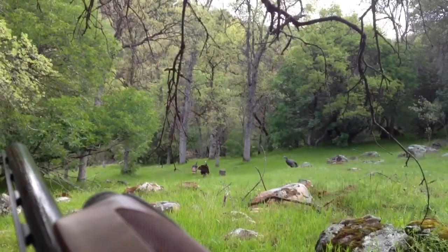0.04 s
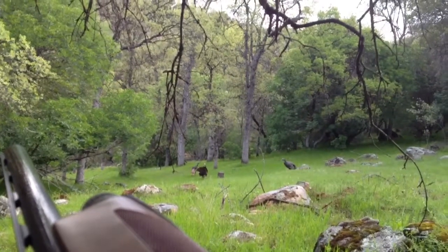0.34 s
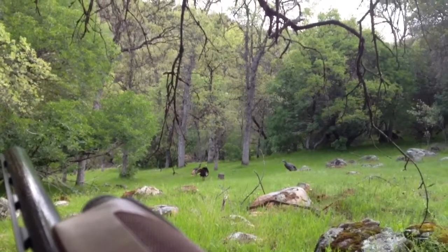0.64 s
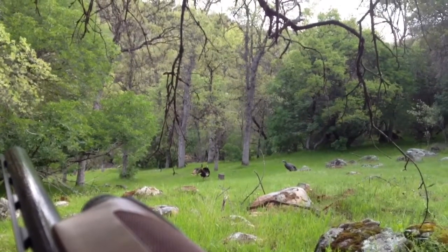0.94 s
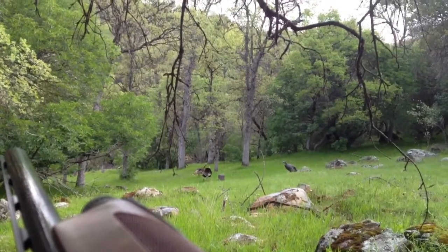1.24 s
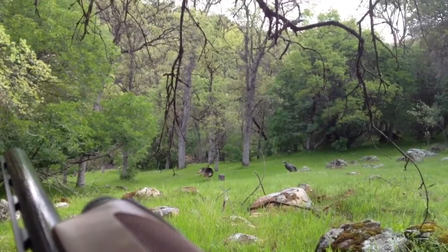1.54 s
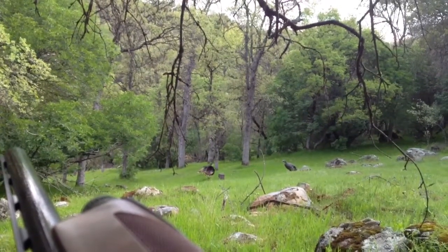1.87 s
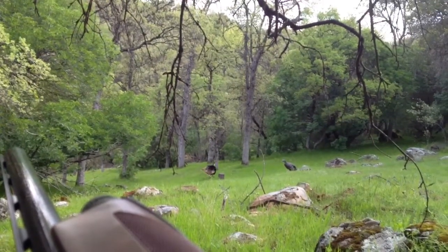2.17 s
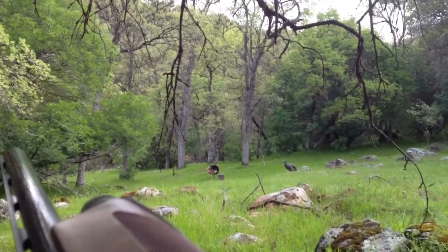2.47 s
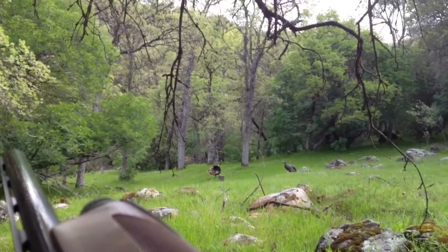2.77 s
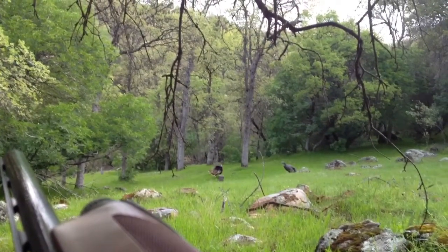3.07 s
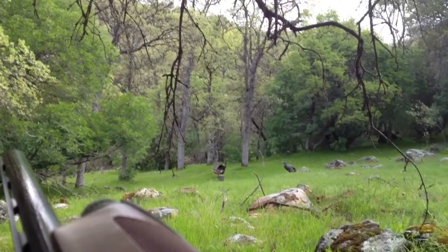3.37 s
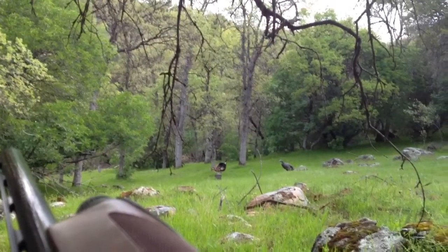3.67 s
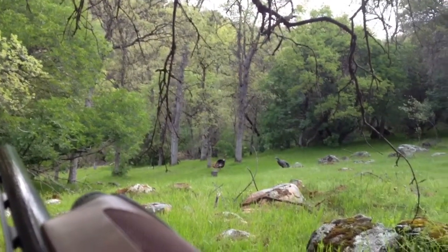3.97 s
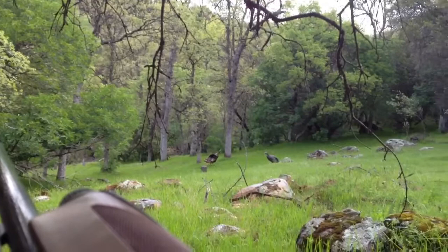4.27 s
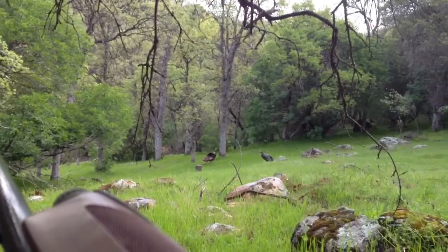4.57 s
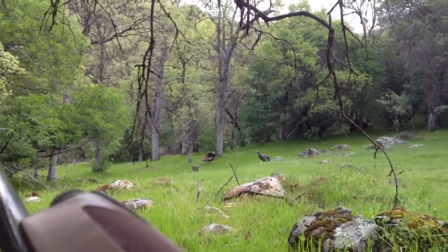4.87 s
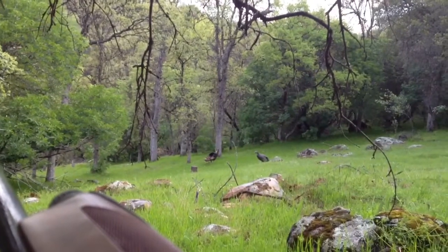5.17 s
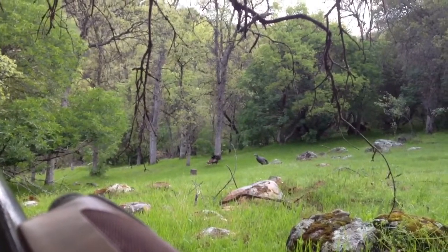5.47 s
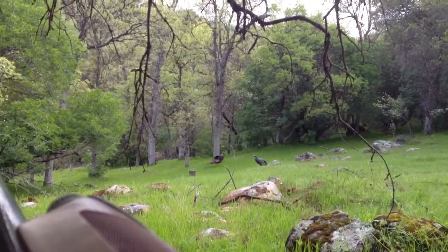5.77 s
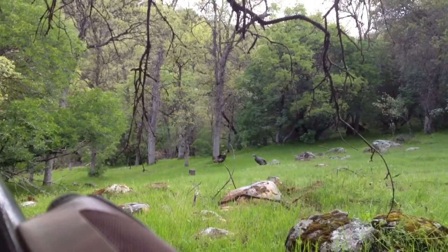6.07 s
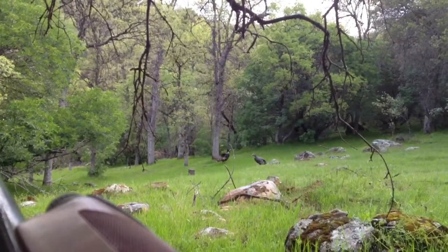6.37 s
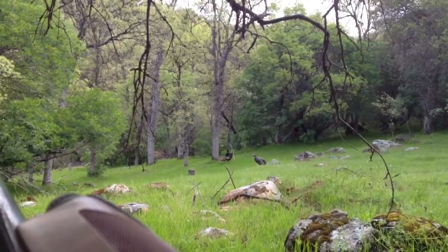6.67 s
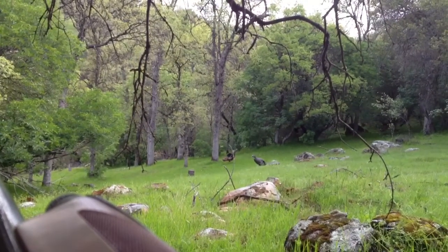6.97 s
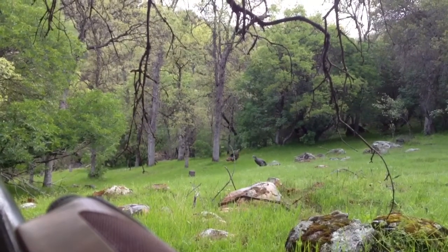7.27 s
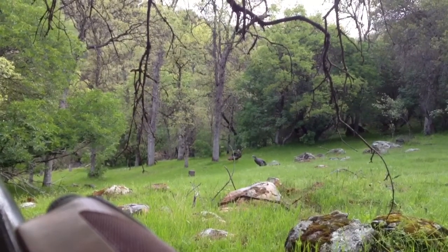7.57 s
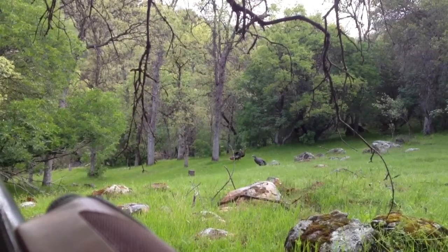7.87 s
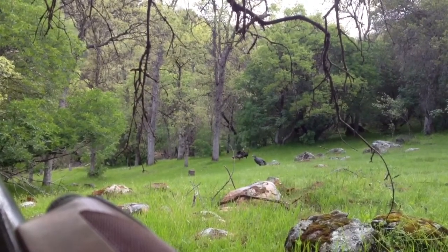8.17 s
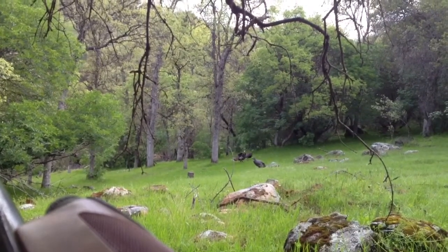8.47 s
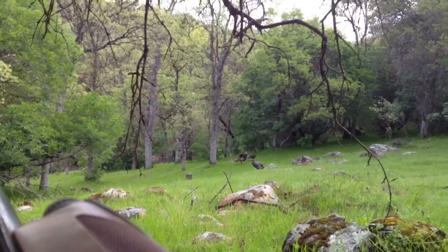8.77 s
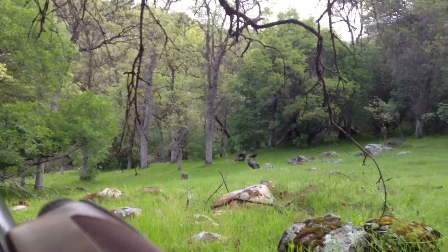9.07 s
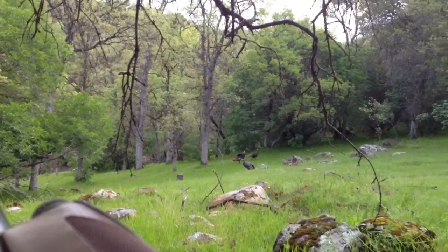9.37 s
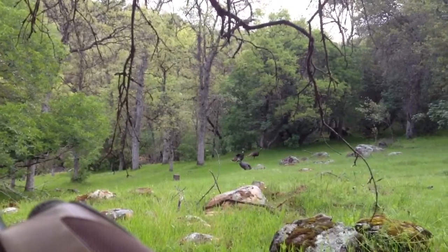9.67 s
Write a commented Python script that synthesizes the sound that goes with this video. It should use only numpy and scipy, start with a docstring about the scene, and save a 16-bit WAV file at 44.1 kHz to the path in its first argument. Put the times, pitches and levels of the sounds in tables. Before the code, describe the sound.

Close turkey calls, scattered clucks, purrs and squeaks, then a run of raspy yelps, in a quiet meadow with faint songbirds.

```python
"""Turkey calls close by, likely from a hunter's reed call: clucks, purrs and squeaks, then a run of yelps.
A thin membrane vibrates in a stream of air and a cavity filters its harmonics. Tension sets the pitch:
each yelp drops into a raspy buzz as the membrane slackens and springs back up as it tightens.
Around it lies a quiet spring meadow: small songbirds chirp far off, something ticks, the air hums
faintly and the tree line returns a weak echo."""
import sys
import numpy as np
from scipy import signal
from scipy.fft import rfft, irfft, next_fast_len
from scipy.io import wavfile
from scipy.ndimage import map_coordinates

SR = 44100
rng = np.random.default_rng(int(sys.argv[2]) if len(sys.argv) > 2 else 0)


def dump_mix(stems):
    """Bounce the given channels to the path in sys.argv[1] as a 16-bit WAV at rate SR."""
    frames = np.atleast_2d(stems).T  # one column per channel
    limited = np.clip(frames, -1, 1)  # hard clip at full scale
    pcm = np.round(limited * 32767).astype(np.int16)
    wavfile.write(sys.argv[1], SR, pcm)


N = 437472
BAND_LIMIT_HZ = 15400


# One yelp breaks into a flutter: start t/s, end t/s, flapping f/Hz
FLUTTER_SPAN = (7.395, 7.439, 240)
def yelps(slack_hz=740, cavity_hz=1070, cavity_db=2.5, jitter=.0048, waver=.007, flutter_rise_hz=330):
    """Self-sustained oscillation: air drives a membrane, and flutter modulates its pitch and amplitude."""
    pitch, strength, rasp_db = gestures()
    t = np.arange(N) / SR
    start, end, flap_hz = FLUTTER_SPAN
    flutter = smooth(1.0 * ((t > start) & (t < end)), .0085)
    flap = np.sin(2 * np.pi * flap_hz * t + .9 * wobble(150))
    # the harder the rasp, the less regular the cycles
    unrest = jitter * amp(2 * np.clip(rasp_db, -3, 2)) * (wobble(700) + wobble(130))
    unrest += waver * wobble(60) + .075 * flutter * wobble(900)
    pitch = pitch * (1 + unrest) + flutter * (flutter_rise_hz + 70 * flap)
    strength *= 1 + .98 * flutter * flap
    # the note swells as its pitch crosses the main resonance
    strength *= amp(cavity_db * np.exp(-((pitch - cavity_hz) / 140) ** 2))
    phase = 2 * np.pi * np.cumsum(pitch) / SR
    on = np.flatnonzero(strength > 1e-5)
    tension = np.log2(pitch[on] / slack_hz) * (1 - .57 * flutter[on])
    tone = np.zeros(N)
    tone[on] = harmonics(pitch[on], phase[on], tension, rasp_db[on])
    return strength * tone + puffs(strength, phase, tension, on) + burr(flutter)


# Clucks and yelps: start t/s, end t/s, slack f/Hz, tightening f/Hz, rebound f/Hz,
# relative level/dB, rasp/(dB per octave)
NOTES = [(0.153, 0.206, 693.5, 371.4, 46, -26, 1.7), (1.477, 1.568, 744.7, 155.3, 92.5, -26.5, 1.2),
         (2.247, 2.278, 783, 289.3, -1.5, -26, 1.5), (2.339, 2.371, 814, 233.6, 0, -25, 1),
         (2.642, 2.699, 787, 130.4, -0.5, -26.4, 1.7), (2.825, 2.854, 775, 116.7, 2, -25.5, -0.1),
         (2.913, 2.936, 846, 25.1, 2, -25, -2.5), (5.136, 5.192, 728, 575.6, 2.5, -24.5, -2.5),
         (5.918, 5.939, 654.5, 268.3, -1.5, -25, 3), (6.085, 6.118, 690, 390.8, -1.5, -26, 1.6),
         (6.248, 6.301, 645.3, 222, 100, -25, 0.5), (6.447, 6.525, 661, 428.2, 91, -25, 0.7),
         (6.657, 6.737, 700, 183.2, 29.5, -25, 0), (6.877, 6.972, 721, 144.1, 19, -25, 0.5),
         (7.126, 7.231, 718.3, 121.3, 14, -25.5, 0.5), (7.378, 7.471, 659.8, 147, 70.5, -26, 0.5),
         (7.65, 7.741, 683, 290.2, 46, -25, -0.5), (7.914, 8.001, 686, 282.8, 61, -26, 0.5),
         (8.014, 8.053, 731, 219, 0.5, -25.5, -3.5)]
# Pitch contours of two warbled notes: t/s, f/Hz
WARBLE_CONTOURS = [
    [(1.157, 1230), (1.168, 797), (1.178, 806.5), (1.191, 1118), (1.201, 885.3), (1.21, 1136)],
    [(8.223, 1234), (8.232, 794), (8.245, 820), (8.265, 713.5), (8.308, 784), (8.326, 994), (8.344, 944),
     (8.351, 894), (8.369, 1074), (8.379, 995), (8.389, 1131)],
]
def gestures(warble_db=-25.5, warble_rasp_db=-.5, mellow_db_per_s=42.5):
    """Each push of air sets the membrane's pitch, amplitude and spectral tilt; the rasp falls with time."""
    notes = []
    for start, end, slack_hz, tighten_hz, rebound_hz, db, rasp_db in NOTES:
        i, t = span(start, end)
        notes.append((i, t, note_pitch(t, slack_hz, tighten_hz, rebound_hz), db, rasp_db))
    for contour in WARBLE_CONTOURS:
        i, t = span(contour[0][0], contour[-1][0])
        notes.append((i, t, np.interp(i / SR, *np.transpose(contour)), warble_db, warble_rasp_db))
    pitch, strength, rasp = np.zeros((3, N))
    for i, t, hz, db, rasp_db in notes:
        pitch[i], strength[i] = hz, amp(db)
        rasp[i] = rasp_db - mellow_db_per_s * (t - t.mean())
    sounding = np.flatnonzero(pitch)
    pitch = np.interp(np.arange(N), sounding, pitch[sounding])
    return smooth(pitch, .00178), smooth(strength, .00599), smooth(rasp, .0039)


def note_pitch(t, slack_hz, tighten_hz, rebound_hz, first_hz=1187, last_hz=1332, lift_s=.0038):
    """Frequency follows tension: the membrane slackens, bounces once, tightens late and springs back."""
    length = t[-1]
    bounce = rebound_hz * np.exp(-((t - .021) / .013) ** 2)
    held = slack_hz + tighten_hz * (t / length) ** 2.12 + bounce
    drop_s = .0058 * (.046 / length) ** .46  # short clucks fall more gently
    drop = (first_hz - held) * np.exp(-(t / drop_s) ** 2)
    lift = (last_hz - held) * np.exp((t - length) / lift_s)
    return held + drop + lift


# Response of the cavity in front of the membrane: f/Hz, gain/dB
CAVITY_RESPONSE = [(300, -4.5), (740, 4), (1050, 3), (1480, 3.5), (1850, -9.5), (2300, -4), (2900, -22),
                   (3300, -11.5), (3700, -10), (4050, -13.5), (4450, -9.5), (4830, -23.5), (5700, -11),
                   (6750, -12.5), (7600, -25), (8500, -57.5)]
# Its faint top: f/Hz, relative gain/dB
CAVITY_TREBLE = [(8000, -56.5), (9500, -65), (11300, -53.5), (12000, -45.5), (13500, -50), (14300, -51.5),
                 (15400, -55.5)]
def harmonics(pitch, phase, tension, rasp_db, mellow_db=24, pure_db=16, flicker_db=.69, drift_db=1.33):
    """Source and filter: a slack membrane slaps shut, rich in overtones; a tight one nearly whistles."""
    order = np.arange(1, 20)[:, None]
    hz = order * pitch
    octaves = np.clip(np.log2(hz / 2000), 0, 1.7)
    tilt_db = octaves * (rasp_db - mellow_db * tension) - pure_db * tension ** 2 * (order > 1)
    # each overtone flickers quickly and drifts slowly by itself
    flicker = np.array([wobble(110, len(pitch)) for _ in order])
    drift = np.array([wobble(26, len(pitch)) for _ in order])
    shimmer_db = np.minimum(order - 1, 4) * flicker_db * flicker + (order > 2) * drift_db * drift
    treble = amp(along(CAVITY_TREBLE, hz) + 10 - 60 * np.maximum(tension, 0))
    cavity = amp(along(CAVITY_RESPONSE, hz)) + treble
    gains = cavity * amp(tilt_db + shimmer_db) * (hz < BAND_LIMIT_HZ)
    lag = .4 * order ** 2  # the cavity delays each overtone more than the one below
    return np.sum(gains * np.cos(order * phase - lag), 0) / np.sqrt(np.sum(gains ** 2, 0) / 2)


# Air rushing past the membrane: f/Hz, relative level/dB
PUFF_SPECTRUM = [(100, -45), (400, -10), (900, 7), (2300, 5), (2900, -3), (4200, 5), (4900, 0), (6600, 7),
                 (7700, -3), (8800, -25), (12200, -11), (15000, -17)]
def puffs(strength, phase, tension, on, gain_db=-26.5):
    """Flow noise: air escapes once a cycle, less of it when the membrane is tight."""
    flow = np.zeros(N)
    flow[on] = (1 + np.cos(phase[on])) * amp(gain_db - 20 * tension)
    return filtered(strength * flow * rng.standard_normal(N), lambda f: amp(along(PUFF_SPECTRUM, f)))


# Low burr of the flutter: f/Hz, relative level/dB
BURR_SPECTRUM = [(60, -60), (200, -24), (320, -16), (440, 1), (600, -8), (1500, -30), (4000, -70)]
def burr(flutter, level_db=-46.5):
    """Aperiodic vibration: a low band of noise sounds while the membrane flutters."""
    return amp(level_db) * flutter * noise(BURR_SPECTRUM)


# Purrs of the loose membrane: start t/s, end t/s, slap rate f/Hz, relative level/dB, unevenness (0-1)
SLAP_TRAINS = [(0.255, 0.33, 660, -38, .3), (1.003, 1.067, 680, -38, .12), (1.106, 1.232, 710, -39.5, .25),
               (1.247, 1.309, 600, -41.5, .25), (1.873, 1.885, 560, -43.5, 0.3),
               (1.97, 2.008, 684, -37.5, .1), (2.162, 2.2, 703, -35.5, .06),
               (2.213, 2.257, 600, -41.5, 0.3), (2.271, 2.39, 476, -37.5, .25),
               (2.422, 2.43, 620, -48.5, 0.3), (2.812, 2.956, 600, -40, .3), (5.008, 5.037, 600, -38.5, .1),
               (5.058, 5.106, 360, -46.5, .1), (5.13, 5.137, 620, -36, .1), (5.911, 5.927, 210, -38.5, 0.4)]
def purrs(sag=.2, fade_db=3.5):
    """Impulse excitation: uneven slaps ring the cavity, slowing and fading as the push gives out."""
    slaps = np.zeros(N)
    for start, end, rate, db, uneven in SLAP_TRAINS:
        i, t = span(start, end)
        spent = (t / t[-1]) ** 6
        slap_hz = rate * (1 - sag * spent) * np.exp(uneven * wobble(400, len(i)))
        cycles = np.floor(np.cumsum(slap_hz) / SR)
        train = np.diff(cycles, prepend=-1) * amp(15 * uneven * wobble(210, len(i)))
        envelope = np.sin(np.pi * (t + .002) / (t[-1] + .0094)) ** .13
        slaps[i] += amp(db - fade_db * spent) * unit(train) * envelope
    return unit(filtered(slaps, cavity_modes)) * np.std(slaps) * amp(-1.1)


def cavity_modes(f):
    """Modal superposition: one strong and three weak resonances, band-passed and rolled off on top."""
    modes = (resonance(f, 1155, 370) - .042 * resonance(f, 2920, 470)
             + .045 * resonance(f, 3600, 530) - .097 * resonance(f, 6900, 1500))
    return modes * resonance(f, 1520, 1200) / np.sqrt(1 + (f / 4800) ** 8)


# Squeaks of the tight membrane: start t/s, end t/s, f/Hz, level/dB
SQUEAK_NOTES = [(0.259, 0.306, 1248, -33.5), (1.019, 1.057, 1292, -37.5), (1.133, 1.15, 1180, -32),
                (2.238, 2.26, 1169, -31), (2.816, 2.837, 1246, -30), (2.908, 2.92, 1266, -33.5),
                (5.017, 5.052, 1212, -26.5)]
def squeaks(second_db=-28, third_db=-24, weak_db=-37, weak_waver=.073):
    """Nearly sinusoidal vibration: thin whistles that waver more the weaker they are."""
    out = np.zeros(N)
    for start, end, hz, db in SQUEAK_NOTES:
        i, t = span(start, end)
        waver = weak_waver * np.exp((weak_db - db) / 11)
        phase = 2 * np.pi * np.cumsum(hz * (1 + waver * wobble(260, len(i)))) / SR
        tone = np.sin(phase) + amp(second_db) * np.sin(2 * phase) + amp(third_db) * np.sin(3 * phase)
        envelope = np.abs(np.sin(np.pi * t / t[-1])) ** .53 * amp(24 * waver * wobble(220, len(i)))
        out[i] += amp(db) * unit(tone * envelope)
    return out


# Small wet clicks between the calls: t/s, relative level/dB
WET_CLICKS = [(0.498, -31.5), (1.725, -30), (2.529, -26), (6.028, -36), (6.391, -27)]
# Their snap: f/Hz, relative level/dB
SNAP_SPECTRUM = [(100, -55), (400, -29), (1100, 11), (1800, -6.5), (3000, -12.5), (4400, -10), (6200, 2),
                 (8000, -26.5), (13000, -32.5)]
def clicks(ring_hz=1100, ring_db=-19, ring_t60=.25, snap_t60=.018, low_cut_hz=500):
    """Damped free vibration: a short soft snap leaves the open cavity ringing faintly."""
    out, snap = np.zeros(N), noise(SNAP_SPECTRUM)
    for start, db in WET_CLICKS:
        i, t = span(start, start + .15)
        ring = np.sin(2 * np.pi * ring_hz * t + wobble(92, len(i))) * amp(ring_db - 60 * t / ring_t60)
        attack = 1 - np.exp(-(t / .001) ** 2)
        out[i] += amp(db) * (snap[i] * amp(-60 * t / snap_t60) + ring) * attack
    return filtered(out, lambda f: f ** 3 / (f ** 3 + low_cut_hz ** 3))


# The clearest songbird chirps: start t/s, first f/Hz, last f/Hz, level/dB
BIRD_CHIRPS = [(.372, 5360, 5700, -71), (.52, 5700, 6060, -69), (0.606, 5950, 4950, -63.5),
               (.655, 4380, 3020, -79), (.84, 5500, 4700, -69), (1.032, 6700, 6000, -71.5),
               (1.79, 4840, 4440, -70), (2.114, 3800, 3630, -64.5), (5.534, 6600, 6776, -64.5),
               (5.645, 5500, 6070, -76)]
def songbirds(shortest_s=.025, glide_hz_per_s=25000):
    """Frequency sweeps: distant whistles that last longer the further they glide."""
    out = np.zeros(N)
    for start, first, last, db in BIRD_CHIRPS + faint_chirps(count=5):
        i, t = span(start, start + shortest_s + abs(last - first) / glide_hz_per_s)
        pitch = np.linspace(first, last, len(i)) * (1 + .02 * wobble(300, len(i)))
        whistle = np.sin(2 * np.pi * np.cumsum(pitch) / SR)
        out[i] += amp(db) * unit(whistle * np.sin(np.pi * t / t[-1]))
    return out


def faint_chirps(count, song_s=(.058, 1), range_hz=(3570, 5100), max_fall_octaves=.22, level_db=-72.5):
    """Random scatter: falling chirps of varied pitch, spread through the song."""
    when, how_high, falls = rng.random((count, 3)).T
    starts = np.interp((np.arange(count) + when) / count, (0, 1), song_s)
    first = np.interp(how_high, (0, 1), range_hz)
    last = first * 2 ** (-max_fall_octaves * falls)
    return [(*chirp, level_db) for chirp in zip(starts, first, last)]


# Phrases of far twitter in the tree tops: start t/s, end t/s, relative level/dB
TWITTER_PHRASES = [(0, 1.4, -74), (1.596, 2.146, -71.5), (2.898, 3.437, -73), (3.986, 4.18, -78),
                   (8.98, 9.148, -78)]
def twitter(gain_db=-4, flicker_db=4.5, fade_s=.17):
    """Amplitude-modulated noise: far song blurs into a high band that swells, flickers and dies away."""
    t = np.arange(N) / SR
    phrases = [amp(db) * np.exp(-np.abs(t - np.clip(t, start, end)) / fade_s)
               for start, end, db in TWITTER_PHRASES]
    envelope = np.max(phrases, axis=0) * amp(gain_db + flicker_db * wobble(22))
    band = noise([(3000, -40.5), (4800, -6.5), (5700, 3.5), (6500, .5), (7600, -30.5), (9000, -53.5)])
    return envelope * band


# Faint dry ticks in the pause: t/s, relative level/dB
DRY_TICKS = [(3.89, -46.5), (4.085, -42), (4.314, -44.5), (4.671, -51), (4.743, -50)]
def ticks(gain_db=-7, t60=.023):
    """Heavily damped transients, perhaps of twigs or gear."""
    out, snap = np.zeros(N), noise([(100, -7), (500, 8.5), (1200, 4.5), (3000, -21.5), (8000, -34)])
    for start, db in DRY_TICKS:
        i, t = span(start, start + .05)
        out[i] += amp(gain_db + db - 60 * t / t60) * snap[i]
    return out


# Echo from the tree line: f/Hz, relative level/dB
TREE_LINE_SPECTRUM = [(600, -6), (1100, 1), (1500, -7), (2300, -3), (2900, -9), (4200, -2), (6000, 6),
                      (8000, 0), (12000, -8)]
def reflections(calls, near_db=-17, far_db=-42):
    """Reflection: ground and trunks answer at once, the far tree line later and weakly."""
    near_spectrum = [(500, -9), (1200, 1.5), (3000, 12), (7000, 6.5), (14000, -15.5)]
    near = echo(calls, near_spectrum, t60=.063, build_s=.0064)
    far = echo(calls, TREE_LINE_SPECTRUM, t60=.9, build_s=.16)
    return amp(near_db) * near + amp(far_db) * far


def echo(x, spectrum, t60, build_s):
    """Diffuse scattering: dense reflections build up, then decay exponentially."""
    t = np.arange(2 * SR) / SR
    tail = noise(spectrum)[:len(t)] * amp(-60 * t / t60) * (1 - np.exp(-(t / build_s) ** 2))
    return signal.fftconvolve(x, tail / np.linalg.norm(tail))[:N]


# Hum and hiss of the air: f/Hz, relative spectral level/dB
AIR_SPECTRUM = [(18, -18), (45, -31), (126, -3), (218, -4.5), (331, -7), (502, -3), (782, -6), (868, -4),
                (1280, -10), (1580, -11), (3040, -18), (5120, -20.5), (6300, -18), (9570, -31),
                (15300, -20)]
# The breeze, which settles at the end: t/s, level/dB
BREEZE_LEVELS = [(0, -62), (3.4, -63.5), (5.8, -63.5), (7.5, -58.5), (8.8, -64.5), (9.92, -65)]
def meadow():
    """Broadband ambient noise: softly moving air and an even hiss."""
    db = np.interp(np.arange(N) / SR, *np.transpose(BREEZE_LEVELS))
    return noise(AIR_SPECTRUM) * amp(db + .2 * wobble(4.7))


def amp(db):
    """Decibels to amplitude ratio."""
    return 10 ** (np.asarray(db) / 20)


def unit(x):
    """Normalisation to rms 1."""
    return x / np.sqrt(np.mean(x ** 2) + 1e-20)


def along(points, hz):
    """Interpolation of (f/Hz, value) points on a logarithmic frequency axis."""
    f, values = np.transpose(points)
    return np.interp(np.log(hz + 1), np.log(f), values)


def wobble(rate, size=N):
    """Random modulation: a smooth curve through `rate` knots a second."""
    knots = rng.standard_normal(int(size * rate / SR) + 4)
    return map_coordinates(knots, [np.arange(size) * rate / SR])


def filtered(x, response):
    """Linear filtering: the spectrum of x times a frequency response."""
    size = next_fast_len(len(x) + SR // 2)
    return irfft(rfft(x, size) * response(np.fft.rfftfreq(size, 1 / SR)), size)[:len(x)]


def noise(spectrum):
    """Gaussian noise of rms 1, shaped by (f/Hz, level/dB) points."""
    return unit(filtered(rng.standard_normal(N), lambda hz: amp(along(spectrum, hz))))


def resonance(f, centre_hz, width_hz):
    """Response of a damped oscillator, with gain 1 at its centre."""
    return 1j * f * width_hz / (centre_hz ** 2 - f ** 2 + 1j * f * width_hz)


def smooth(x, seconds):
    """Gaussian low-pass: rounds off corners over about this time."""
    return filtered(x, lambda hz: np.exp(-(hz * seconds) ** 2))


def span(start, end):
    """Sample indices of an event and the time since its start."""
    i = np.arange(round(start * SR), max(round(end * SR), round(start * SR) + 2))
    return i, (i - i[0]) / SR


def scene():
    """Superposition of the near calls, the far birds, their echoes and the meadow."""
    calls = yelps() + purrs() + squeaks() + clicks()
    birds = songbirds() + twitter()
    call_echoes = reflections(calls)
    bird_echoes = .5 * echo(birds, [(3000, 0), (8000, 0)], t60=.35, build_s=.015)
    return (calls + call_echoes + birds + bird_echoes + ticks() + meadow())[None]


def record(dry, rumble_hz=62):
    """Band limiting: a second-order high-pass sheds the deep bass and a sharp cut ends the treble."""
    def passband(hz):
        return (hz < BAND_LIMIT_HZ) * hz ** 2 / np.sqrt(hz ** 4 + rumble_hz ** 4)
    return filtered(dry[0], passband)[None]


dry = scene()
out = record(dry)
dump_mix(out)
```